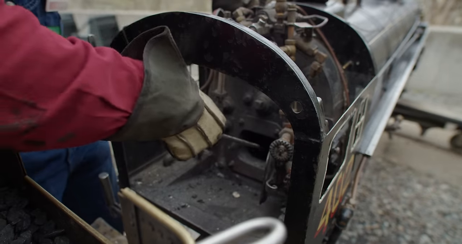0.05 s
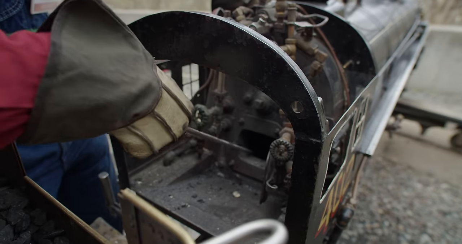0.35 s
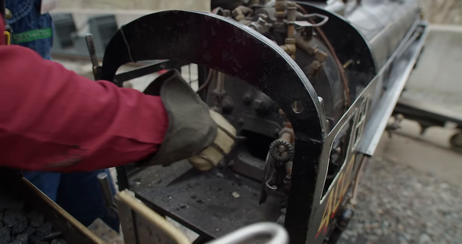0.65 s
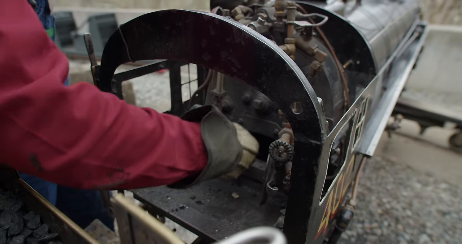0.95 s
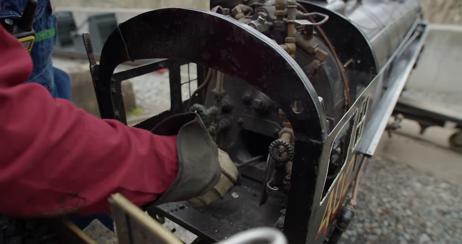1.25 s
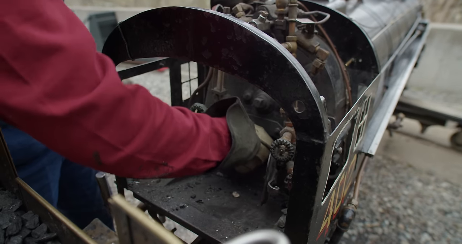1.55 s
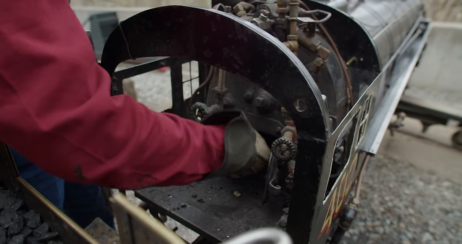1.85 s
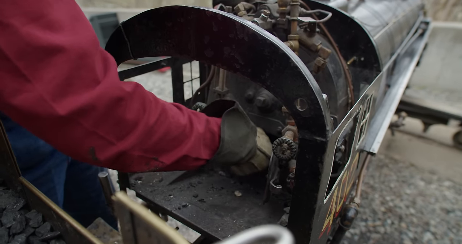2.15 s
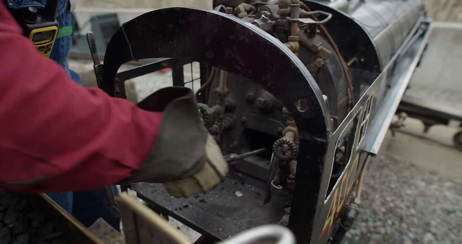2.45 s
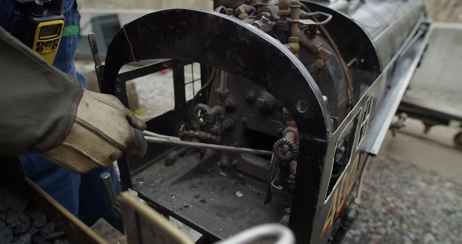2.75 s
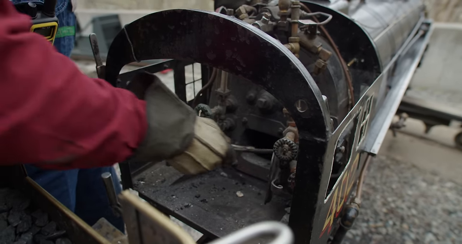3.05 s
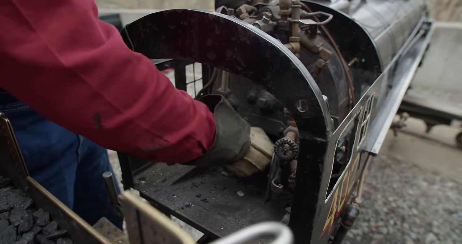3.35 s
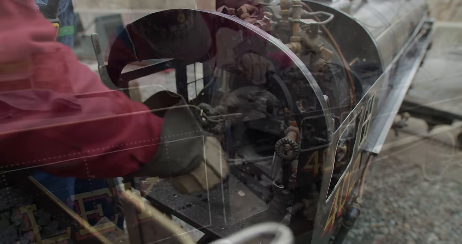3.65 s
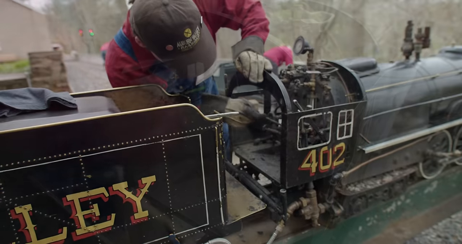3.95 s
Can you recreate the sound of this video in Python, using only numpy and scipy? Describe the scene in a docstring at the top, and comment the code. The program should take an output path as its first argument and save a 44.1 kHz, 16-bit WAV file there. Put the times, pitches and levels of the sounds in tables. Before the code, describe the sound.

A steel rod scrapes and rattles in the coals of a miniature steam engine's firebox, outdoors. It clanks loudly once, tinkles faintly, crunches the coal, then knocks and slides again. Air rumbles low on the microphone.

```python
"""Outdoors, at the firebox of a miniature steam engine, a steel fire rod is worked in the coals.
Friction on the rim of the fire hole keeps its modes ringing as it slides. It clanks against the box,
pokes the coals, is drawn out, knocks and slides in again; its hook tinkles on the grate.
Coal crunches, snaps and groans under it and grit crackles. There are a few dull taps and, near the end,
one short click. Moving air rumbles unevenly on the microphone."""
import sys
import numpy as np
from scipy import signal
from scipy.fft import rfft, irfft
from scipy.io import wavfile
from scipy.ndimage import uniform_filter1d

SR = 44100
rng = np.random.default_rng(int(sys.argv[2]) if len(sys.argv) > 2 else 0)


def to_wav(s):
    """Save 16-bit WAV."""
    ch = np.atleast_2d(s).T  # columns
    pcm = np.round(np.clip(ch, -1, 1) * 32767)  # PCM
    wavfile.write(sys.argv[1], SR, pcm.astype(np.int16))


N = 176400
T = np.arange(N) / SR
RING_T = T[:SR]   # every impact lasts at most one second


# The rod's modes. Each row: frequency in Hz, relative level in dB when met at the tip,
# the same when met along the shaft, 60 dB decay time (t60) in seconds.
ROD_MODES = [(703, -18, -16.5, 0.17), (1136, -17.5, -22.5, 0.15), (1655, -16, -6, 0.039),
             (2120, -10.5, -0.5, 0.045), (2288, -13, -1, 0.069), (2530, -28, 4.5, 0.031),
             (2966, 0, 6, 0.042), (3142, -20, 5.5, 0.017), (3453, -22, 5, 0.029), (3713, -8.5, -3.5, 0.054),
             (4407, -16, -4, 0.073), (4800, -17, -3.5, 0.05), (5260, -26, -7.5, 0.05),
             (5590, -4.5, -3, 0.043), (5970, -5.5, -6, 0.034), (6724, -14, -7, 0.039),
             (7450, -15, -11.5, .035), (8100, -13.5, -9.5, 0.092), (8500, -5, -17, 0.026),
             (9055, -11, -12.5, .03), (9680, -19, -14.5, .05), (10300, -18, -17, 0.041),
             (11460, -20.5, -18.5, 0.1), (12355, -20, -20, 0.06), (13670, -25, -21, .05),
             (14700, -32, -26, .07), (15080, -33, -28, .06)]
# The waves' path along the rod and back to the rim. Each row: time in seconds, round trip in ms.
ROUND_TRIP_MS = [(0, 3.27), (.15, 3.18), (.4, 3.25), (.52, 3.23), (.8, 3.12), (2.3, 3.4), (2.8, 2.96),
                 (3.05, 3.05), (3.4, 3.37), (3.7, 3.3), (4, 3.16)]
def rod_slide():
    """Stick-slip friction: tiny slips drive modes that wax, wane and glide as the contact moves."""
    slips = grains(per_s=3500, spread_db=4, clump_db=2.5)
    trip_ms = np.interp(T, *np.transpose(ROUND_TRIP_MS))
    delay_s = np.cumsum(trip_ms / trip_ms.mean() - 1) / SR   # a longer path lowers the pitch
    ringing = 0
    for hz, _, db, t60 in ROD_MODES:
        glide = .8 * min(1, (4300 / hz) ** 2)   # modes above 4300 Hz glide less
        tone = through(slips, ring([(hz, 0, t60)]))
        gliding = np.interp(T - glide * delay_s, T, tone)
        swing_db = 4.5 * drift(corner_hz=13)
        ringing += np.sqrt(t60) * from_db(db + swing_db) * gliding
    scrape = echoing(coloured(slips, STEEL_SPECTRUM), reflection=.75)
    return evened(rms_one(ringing) + from_db(-10) * scrape, seconds=.047)


def echoing(x, reflection):
    """Comb filtering: fast waves run along the rod and back, so resonances glide as it moves."""
    lag_s = np.interp(T, *np.transpose(ROUND_TRIP_MS)) / 1000
    fast_waves = signal.sosfiltfilt(signal.butter(1, 700, "high", fs=SR, output="sos"), x)
    echoes = sum(reflection ** k * np.interp(T - k * lag_s, T, fast_waves) for k in range(1, 6))
    return rms_one(x + echoes)


# The spectrum of steel contact. Each row: frequency in Hz, relative spectral level in dB.
STEEL_SPECTRUM = [(200, -20), (700, -23.5), (1500, -9), (2200, -0.5), (3300, -9), (4100, -7.5), (6000, -10),
                  (8000, -17), (11000, -24), (16000, -28)]
CRACK_T60_S = .031
def blow(modes, crack_db):
    """Impulse response of steel: a crack, and a ring that quickly sheds 2 dB into the hand."""
    kept, contact_s = from_db(-2), .0098
    damping = kept + (1 - kept) * np.exp(-RING_T / contact_s)
    return ring(modes) * damping + from_db(crack_db) * burst(STEEL_SPECTRUM, CRACK_T60_S)


# The firebox plates' modes. Each row: frequency in Hz, relative level in dB, t60 in seconds.
PLATE_MODES = [(446, -34.5, 0.9), (744, -25, 0.14), (879, -21.5, .1), (1248, -20.5, 0.23),
               (1520, -13, 0.094), (1696, -29, .15), (2020, -11.5, .03), (2207, -7, 0.1), (2644, 5, 0.037),
               (3075, -18, 0.14), (3397, -3.5, 0.06), (3730, -17, 0.09), (4597, -4.5, 0.027),
               (5250, -16, 0.076), (6767, -16.5, 0.07), (8000, -10.5, .035)]
def firebox_clank():
    """Plate vibration: the rod strikes and rebounds; dense modes ring on as a duller wash."""
    start_s, rebound_s = .8134, .0045
    dense_modes = burst(STEEL_SPECTRUM, t60=.14)
    wash = signal.sosfilt(signal.butter(2, 4200, fs=SR, output="sos"), dense_modes)
    strike = placed([(start_s, 2)], lambda: blow(PLATE_MODES, crack_db=-1))
    rebound = placed([(start_s + rebound_s, -3.5)], lambda: burst(STEEL_SPECTRUM, CRACK_T60_S))
    return strike + rebound + placed([(start_s, -13.5)], lambda: wash)


# The shaft knocks on the rim. Each row: start in seconds, level in dB.
SHAFT_KNOCKS = [(.208, -21.5), (.251, -17), (.259, -19), (.588, -28), (.789, -20.5), (2.049, -30),
                (2.131, -32.5), (2.4912, -31.5), (2.6254, -26), (2.8965, -11), (2.9005, -16), (2.916, -17),
                (2.931, -24.5), (2.9565, -19.5), (3.129, -22), (3.853, -30.5), (3.931, -28)]
TIP_S, TIP_DB = 2.815, -6.5
def rod_knocks():
    """Modal excitation: each blow, of tip or shaft, shares its force differently among the modes."""
    tilt_db_per_octave, scatter_db = 1.5, 2.5   # the tilt makes a knock brighter than a slide

    def shaft_knock():
        modes = [(hz, db + tilt_db_per_octave * np.log2(hz) + rng.normal(0, scatter_db), t60)
                 for hz, _, db, t60 in ROD_MODES]
        return blow(modes, crack_db=-8.5)

    tip_modes = [(hz, db, t60) for hz, db, _, t60 in ROD_MODES]
    tip_knock = placed([(TIP_S, TIP_DB)], lambda: blow(tip_modes, crack_db=-8.5))
    return tip_knock + placed(SHAFT_KNOCKS, shaft_knock)


# The hook's modes. Each row: frequency in Hz, relative level in dB, t60 in seconds.
HOOK_MODES = [(1530, 9, 0.56), (1964, 8.5, 0.39), (2640, 1, 0.34), (3130, 8, 0.13), (4350, 0, 0.24),
              (4810, -16, 0.29), (5200, -10, 0.36), (6440, -8, 0.46), (7526, -11, 0.61),
              (10160, -6.5, 0.21)]
# The hook touches the grate. Each row: start in seconds, level in dB, favoured frequency in Hz.
GRATE_TOUCHES = [(.9392, -38.5, 2930), (.9836, -40.5, 4430), (1.1288, -39, 5460), (1.24, -44, 9600),
                 (1.2894, -39, 3480), (1.3543, -40, 2580), (1.4072, -43, 4430), (1.8442, -50.5, 4364),
                 (1.897, -48.5, 4320)]
def hook_tinks():
    """Free vibration: the hook rings on after each touch, which favours the modes near one pitch."""
    fall_db_per_octave = 12

    def tink(centre_hz):
        modes = [(hz, db - fall_db_per_octave * abs(np.log2(hz / centre_hz)), t60)
                 for hz, db, t60 in HOOK_MODES]
        return blow(modes, crack_db=-2)

    return placed(GRATE_TOUCHES, tink)


# The spectrum of coal in the box. Each row: frequency in Hz, relative spectral level in dB.
COAL_SPECTRUM = [(60, 5), (150, -2), (300, -5.5), (500, -2.5), (700, -4), (1000, -3), (1400, -5.5),
                 (2200, -5), (4000, -30.5), (16000, -55)]
def coal_crunch():
    """Granular friction: lumps grind along the rod and sound the hollow box."""
    grinding = coloured(grains(per_s=4000, spread_db=2.5, clump_db=2), COAL_SPECTRUM)
    return evened(echoing(grinding, reflection=.6), seconds=.073)


# The spectrum of breaking grit. Each row: frequency in Hz, relative spectral level in dB.
GRIT_SPECTRUM = [(300, -28), (1500, -1), (3500, -2.5), (5500, -1), (8000, 0), (10000, -3), (13000, -4),
                 (16000, -11.5)]
def grit_crackle():
    """Brittle crushing: cinders give dry ticks and short rings at many pitches."""
    rings = 0
    for hz in np.linspace(1900, 15000, 26):
        breaks = grains(per_s=500, spread_db=2.2, clump_db=3)
        rings += through(breaks, ring([(hz * rng.uniform(.98, 1.02), 0, .03)]))
    ticks = coloured(grains(per_s=5000, spread_db=3.2, clump_db=3.5), GRIT_SPECTRUM)
    return evened(coloured(rings, GRIT_SPECTRUM) + from_db(-4) * ticks, seconds=.035)


# Bits of coal snap. Each row: start in seconds, level in dB.
COAL_SNAPS = [(.034, -30.5), (.251, -22), (1.43, -37), (2.3505, -37.5), (2.4583, -30.5), (2.4912, -29.5),
              (2.5167, -29), (2.5765, -29), (2.591, -20.5), (2.598, -24), (2.6254, -25.5), (2.643, -38),
              (2.6603, -33.5), (2.684, -43), (2.75, -45), (2.789, -39.5)]
def coal_snaps():
    """Brittle fracture: each break is a short, bright burst of noise."""
    return placed(COAL_SNAPS, lambda: burst(GRIT_SPECTRUM, t60=.029))


# Dull taps and, near the end, one short click. Each row: start in seconds, level in dB.
TAPS_AND_CLICK = [(.039, -21), (.252, -25), (.556, -27), (.588, -21), (2.7885, -31.5), (2.864, -31),
                  (3.824, -27.5)]
def taps_and_click():
    """Noise transients: dull taps and, near the end, one short click, all too brief for a pitch."""
    return placed(TAPS_AND_CLICK, lambda: burst(COAL_SPECTRUM, t60=.026))


# Lumps are shoved. Each row: middle in seconds, level in dB, band centre in Hz, length in seconds.
COAL_SHOVES = [(0.041, -29, 140, 0.019), (0.477, -38.5, 960, 0.11), (0.557, -38.5, 192, 0.028),
               (2.251, -36, 557, 0.062), (2.377, -39.5, 395, 0.11), (2.565, -40.5, 1920, 0.13),
               (2.595, -28, 910, 0.014), (2.833, -35.5, 328, 0.049), (2.906, -41.5, 294, 0.06),
               (2.959, -35.5, 228, 0.064), (3.168, -40, 402, 0.11)]
def coal_groans():
    """Narrow-band noise: each shoved lump groans under a Gaussian envelope."""
    octave = np.log2(np.maximum(np.arange(N // 2 + 1) * SR / N, 1))
    half_width_octaves, groans = .26, 0
    for s, db, hz, length in COAL_SHOVES:
        response = 1 / (1 + ((octave - np.log2(hz)) / half_width_octaves) ** 2)
        band = irfft(rfft(rng.standard_normal(N)) * response, N)
        swell = np.exp(-(2 * (T - s) / length) ** 2)
        groans += from_db(db) * evened(band, seconds=.094) * swell
    return groans


# Air bumps the microphone. Each row: middle in seconds, peak level in dB, frequency in Hz.
AIR_BUFFETS = [(2.465, -3, 25.6), (3.462, -12, 41.7)]
def air_buffets():
    """Pressure pulses: each bump of moving air is a single slow swing."""
    half_width_s = .016
    return sum(from_db(db) * np.cos(2 * np.pi * hz * (T - s)) * np.exp(-((T - s) / half_width_s) ** 2)
               for s, db, hz in AIR_BUFFETS)


# The spectra of rumble and outdoor air. Each row: frequency in Hz, relative spectral level in dB.
RUMBLE_SPECTRUM = [(10, 1), (22, 3.5), (36, -8.5), (50, -12), (70, -16), (100, -23), (160, -33), (300, -41),
                   (1000, -81.5)]
AIR_SPECTRUM = [(60, 4.5), (200, -3), (400, 4), (1000, -7), (3000, -28.5), (6000, -36.5), (15000, -41)]
# The rumble's swells. Each row: time in seconds, level in dB.
RUMBLE_SWELLS = [(0, -27.5), (.4, -29), (.5, -25.5), (.9, -29.5), (.97, -21), (1.28, -28), (1.37, -22),
                 (1.6, -27.5), (1.75, -25), (2.38, -23.5), (2.5, -14), (2.6, -24.5), (3.5, -23), (4, -27)]
def outdoor_air():
    """Turbulence: air moving on the microphone rumbles unevenly over a faint, steady noise."""
    swell, = gains(RUMBLE_SWELLS)
    rumble = evened(coloured(rng.standard_normal(N), RUMBLE_SPECTRUM), seconds=.083)
    return swell * rumble + from_db(-54.5) * coloured(rng.standard_normal(N), AIR_SPECTRUM)


def from_db(db):
    """Decibels as an amplitude ratio."""
    return 10 ** (np.asarray(db) / 20)


def rms_one(x):
    """Normalisation to rms 1."""
    return x / np.sqrt(np.mean(x ** 2) + 1e-20)


def evened(x, seconds):
    """Running normalisation: the slow level is held at rms 1."""
    power = np.abs(uniform_filter1d(x ** 2, int(seconds * SR) + 1))
    return x / np.sqrt(power + 1e-9)


def gains(rows):
    """Interpolation: each dB column of a time curve becomes a gain for every sample."""
    s, *columns = np.transpose(rows)
    return [from_db(np.interp(T, s, db)) for db in columns]


def coloured(x, spectrum):
    """Spectral shaping along a log-frequency curve; rms 1."""
    hz, db = np.transpose(spectrum)
    bin_hz = np.maximum(np.arange(len(x) // 2 + 1) * SR / len(x), 1)
    response = from_db(np.interp(np.log(bin_hz), np.log(hz), db))
    return rms_one(irfft(rfft(x) * response, len(x)))


def drift(corner_hz):
    """Low-pass noise: a slow random wander of rms 1."""
    size = N // 40
    bin_hz = np.arange(size // 2 + 1) * SR / N
    slow = irfft(rfft(rng.standard_normal(size)) / (1 + (bin_hz / corner_hz) ** 2), size)
    return np.interp(T, np.linspace(0, T[-1], size), rms_one(slow))


def grains(per_s, spread_db, clump_db):
    """Shot noise: random clicks of uneven size, louder in clumps."""
    sizes_db = spread_db * np.minimum(rng.exponential(1, N), 5) + clump_db * drift(corner_hz=66)
    return from_db(sizes_db) * rng.choice([-1, 1], N) * (rng.random(N) < per_s / SR)


def dying(t60):
    """Exponential decay by 60 dB in t60 seconds."""
    return np.exp(-np.log(1000) * RING_T / t60)


def ring(modes):
    """Modal superposition: decaying sines that start with rms 1 together."""
    hz, db, t60 = np.transpose(modes)
    sizes = from_db(db) / np.sqrt(np.sum(from_db(db) ** 2) / 2)
    return sum(size * np.sin(2 * np.pi * (f * RING_T + rng.random())) * dying(decay_s)
               for f, size, decay_s in zip(hz, sizes, t60))


def burst(spectrum, t60):
    """Decaying noise, like countless short modes overlapping."""
    return coloured(rng.standard_normal(SR), spectrum) * dying(t60)


def through(x, response):
    """Convolution: x excites a body with this impulse response; rms 1."""
    return rms_one(signal.fftconvolve(x, response)[:N])


def placed(rows, sound):
    """Superposition of a fresh sound for each row: start in seconds, level in dB, its own settings."""
    track = np.zeros(N + 2 * SR)
    for s, db, *settings in rows:
        start = int(s * SR)
        track[start:start + SR] += from_db(db) * sound(*settings)
    return track[:N]


# The rod's strokes. Each row: time in seconds, then the levels of slide, crunch and grit in dB.
STROKE_LEVELS = [(0, -42, -30, -55), (.028, -45, -32.5, -54), (.036, -50, -32, -35.5),
                 (.13, -43.5, -41, -52.5), (.203, -43.5, -38.5, -53), (.235, -38, -29, -46),
                 (.29, -35, -37, -67), (.35, -45, -40.5, -78), (.405, -58, -59, -72),
                 (.416, -49.5, -40, -79), (.475, -42.5, -46, -79), (.52, -37.5, -40.5, -53),
                 (.545, -30.5, -22.5, -32), (.582, -38, -35, -43.5), (.62, -35.5, -33.5, -45.5),
                 (.8, -41.5, -35.5, -49), (.91, -49, -45.5, -73), (.98, -49.5, -54, -54.5),
                 (1.1, -53.5, -50.5, -63.5), (1.33, -48, -55.5, -59), (1.37, -41.5, -43, -80),
                 (1.46, -44, -40, -50), (1.56, -42.5, -44, -59), (1.67, -67.5, -59, -71),
                 (1.87, -56.5, -64, -68.5), (1.9, -53.5, -50, -84), (2.01, -59, -60, -63.5),
                 (2.07, -49.5, -40.5, -53.5), (2.2, -52.5, -53, -63), (2.25, -42.5, -42.5, -55),
                 (2.338, -53, -55, -60), (2.355, -36, -35, -47.5), (2.42, -50, -51.5, -59),
                 (2.5, -33, -39, -50), (2.55, -42, -41, -38), (2.61, -35.5, -34.5, -44),
                 (2.68, -37.5, -45.5, -55), (2.78, -55, -60, -63), (2.895, -54, -46.5, -63),
                 (2.92, -37, -34, -48), (2.99, -35.5, -43, -68), (3.05, -28.5, -37, -64),
                 (3.117, -32, -43, -53), (3.135, -20.5, -35, -44), (3.2, -27.5, -40, -51),
                 (3.27, -39.5, -41.5, -62), (3.31, -41.5, -40.5, -44.5), (3.42, -46, -49, -67),
                 (3.5, -52.5, -54, -78), (3.58, -44.5, -42, -45), (3.63, -29.5, -35.5, -45),
                 (3.77, -33, -36, -62), (3.84, -44.5, -41.5, -60), (3.87, -42, -44.5, -50),
                 (3.925, -40.5, -42, -50), (4, -19, -31, -27)]
def scene():
    """Linear superposition: rod, coal and air add at one microphone."""
    slide_gain, crunch_gain, grit_gain = gains(STROKE_LEVELS)
    rod = firebox_clank() + rod_knocks() + hook_tinks() + slide_gain * rod_slide()
    coal = crunch_gain * coal_crunch() + grit_gain * grit_crackle() + coal_snaps()
    return (rod + coal + taps_and_click() + coal_groans() + air_buffets() + outdoor_air())[None]


def record(dry):
    """Clipping and band limiting: the loudest clank overloads, and the top treble is cut."""
    low_pass = signal.ellip(10, .1, 80, 15800, fs=SR, output="sos")
    return signal.sosfilt(low_pass, np.clip(dry, -1, 1))


dry = scene()
out = record(dry)
to_wav(out)
```